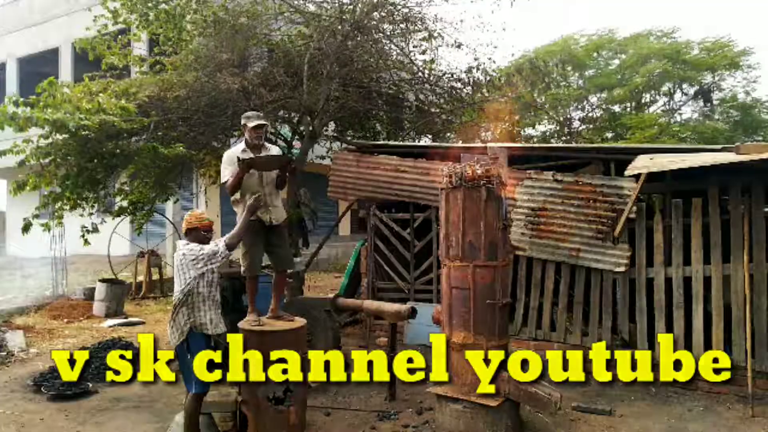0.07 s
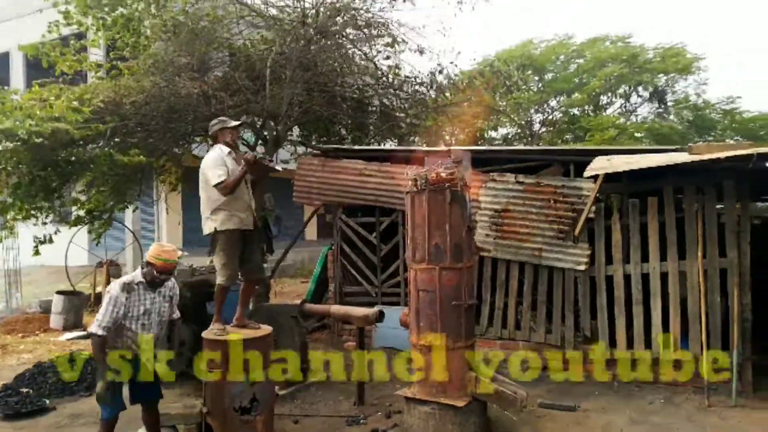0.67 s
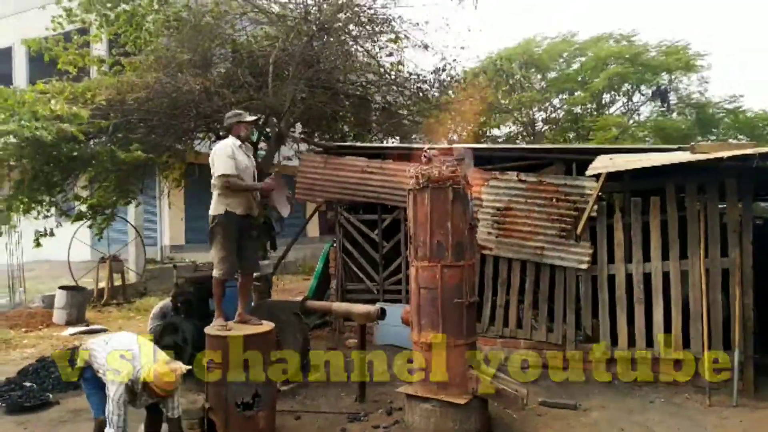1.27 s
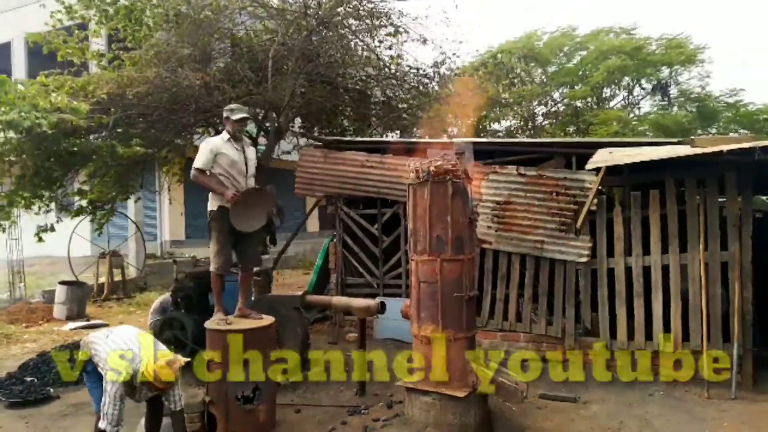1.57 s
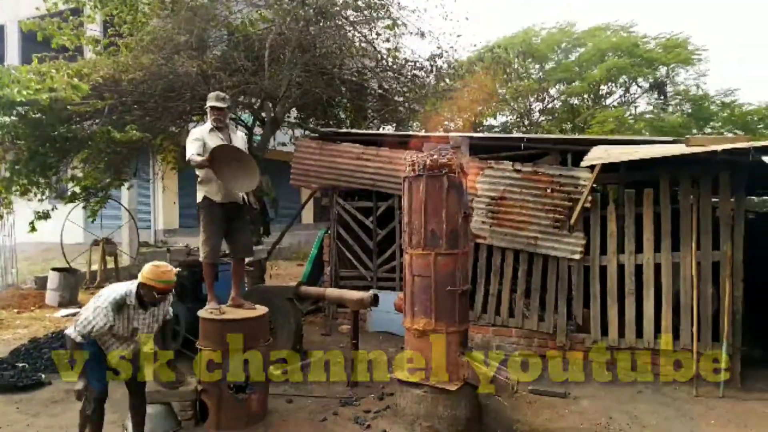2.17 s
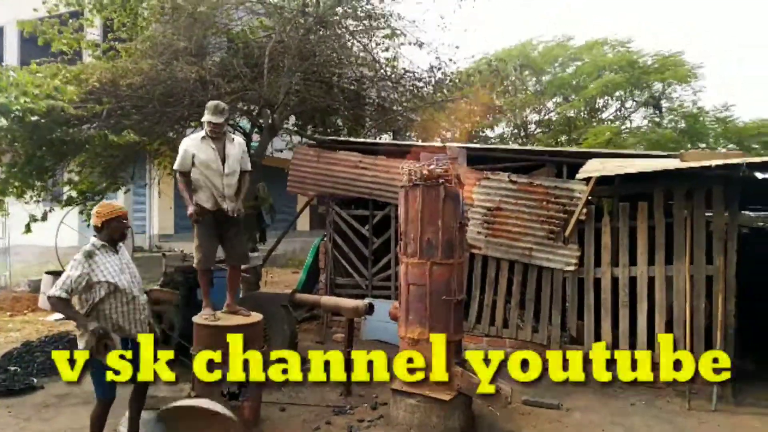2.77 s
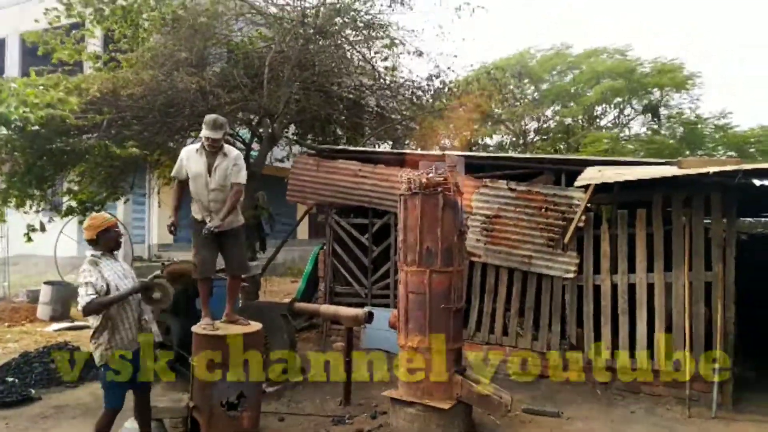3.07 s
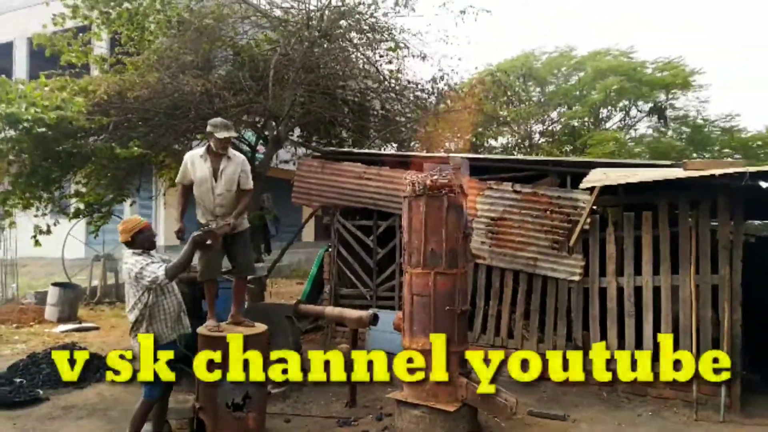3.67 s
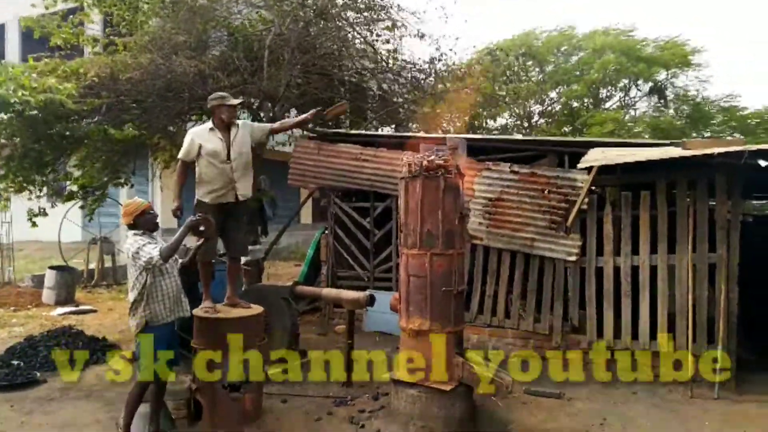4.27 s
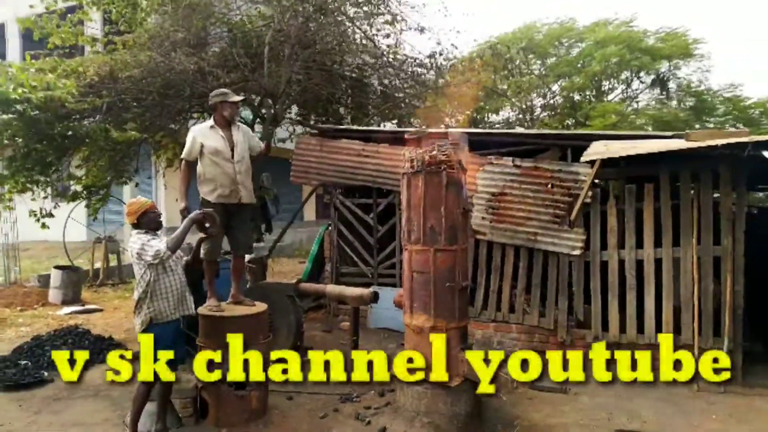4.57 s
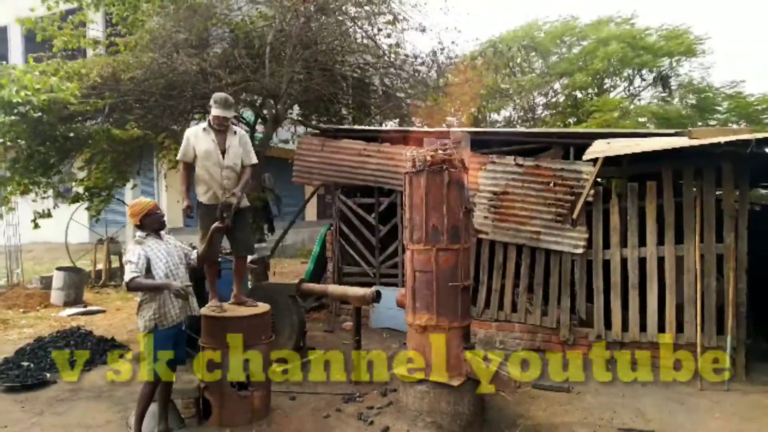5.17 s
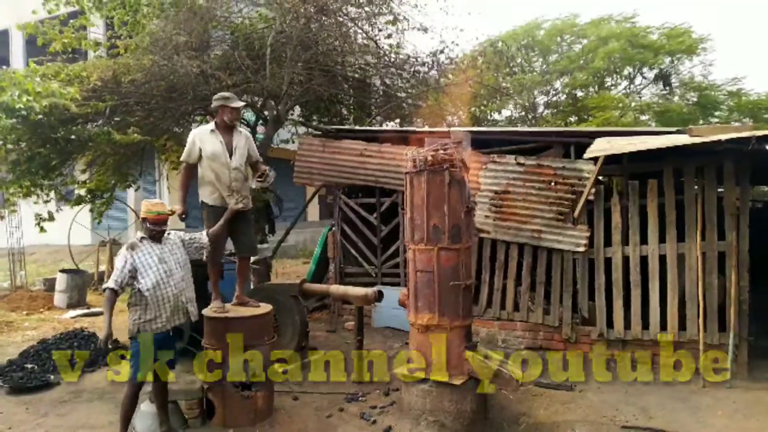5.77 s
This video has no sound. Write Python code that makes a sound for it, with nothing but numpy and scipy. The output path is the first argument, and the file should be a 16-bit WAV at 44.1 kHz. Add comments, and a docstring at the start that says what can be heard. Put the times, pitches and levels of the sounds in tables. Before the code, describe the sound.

A small furnace roars steadily in a yard between tin sheds, with low fluttering flames, a grainy air blast and faintly spitting coke. A blower hums with a slight waver while a single-cylinder engine thumps, puffs and clacks. Early on, a pan of lumps slides into the shaft in a brief clinking rush. Later, metal pans lightly knock and scrape, and a steel drum takes a few dull bumps.

```python
"""The roar of a small cupola furnace fades in, in a yard between tin sheds: fluttering flames, a grainy
air blast and spitting coke. A four-bladed blower feeds it air with a wavering hum, driven by a slow
single-cylinder engine that thumps, puffs and clacks on every cycle. A pan of charge is tipped into
the shaft in a clinking rush; metal pans knock and scrape as they are handed up, and a steel drum
takes a few dull bumps."""
import sys
import numpy as np
from scipy import signal
from scipy.fft import rfft, irfft
from scipy.io import wavfile

SR = 44100
rng = np.random.default_rng(int(sys.argv[2]) if len(sys.argv) > 2 else 0)


def transcribe(signal):
    """Save signal, clipped to [-1, 1], as a 16-bit WAV file at the path in sys.argv[1]."""
    frames = np.atleast_2d(signal).T
    limited = np.clip(frames, -1, 1)
    pcm = np.round(limited * 32767).astype(np.int16)
    wavfile.write(sys.argv[1], SR, pcm)


N = 265482
TIME = np.arange(N) / SR
BINS_HZ = np.maximum(np.arange(N // 2 + 1) * SR / N, 1)
FIRING_HZ, FIRST_FIRING_S = 7.7444, .117

# colour of the flames in the shaft (frequency [Hz], relative level [dB])
FLAME_COLOUR = [(15, -45), (25, -37), (59, 1.5), (112, -4), (135, -6), (160, -6), (185, -5), (218, -9),
                (309, -8), (335, -8.5), (395, -8.5), (437, -11), (480, -12.5), (555, -18.5), (615, -10.5),
                (766, -10.5), (1300, -21.5), (1690, -39), (2860, -120)]
# swells in the hollow upper roar (time [s], gain [dB])
UPPER_ROAR_SWELL = [(0.4, 3.5), (0.55, 2), (0.75, 2.5), (1.22, -2), (1.42, 1.5), (2.0, 0), (2.45, 2.5),
                    (2.95, 1.5), (3.1, -1.5), (3.35, 0), (3.78, 3), (4.05, 1.5), (4.95, 3.5), (5.25, 1.5),
                    (5.6, 2), (5.95, 1.5)]
# surges in the deepest rumble (time [s], gain [dB])
RUMBLE_SURGE = [(0.8, -2), (1.25, 1), (1.8, -1.5), (2.05, 0), (2.5, -4), (3.55, 0), (4.2, -5.5), (4.95, 0),
                (5.25, 0), (5.7, 2), (6.0, -2)]
# colour of the air rushing through pipe and coke bed (frequency [Hz], relative level [dB])
BLAST_COLOUR = [(710, -29), (1200, -8), (1350, -16), (1450, 2.5), (1700, -0.5), (1850, -4.5), (1970, -5),
                (2280, 2.5), (2590, -3), (3160, -5), (3420, -5.5), (3950, -5.5), (6160, -15.5), (8000, -33),
                (10400, -50), (17600, -120)]
# swing of the air rush, partly followed by blast and exhaust hiss (time [s], gain [dB])
AIR_RUSH = [(0.5, -2), (1.55, -0.5), (2.1, -2), (2.7, 0.5), (3.1, -2.5), (3.4, 0), (4.4, -0.5), (5.8, -2)]
# hollow resonance in the air rush (frequency [Hz], relative level [dB])
HOLLOW_COLOUR = [(1000, -50), (1380, -26), (1455, 1.5), (1505, -14), (1555, 0.5), (1605, -9.5), (1645, 4),
                 (1700, -3.5), (1800, -6.5), (2000, -11.5), (2200, -34), (2500, -16), (3500, -50)]
# that resonance dies away and returns (time [s], level [dB])
HOLLOW_LEVEL = [(0.35, -29.5), (0.95, -32), (1.7, -35.5), (2.2, -31), (2.7, -42), (3.3, -48), (3.9, -40),
                (4.7, -34), (5.5, -35), (6.0, -32.5)]
# colour of the spitting coke (frequency [Hz], relative level [dB])
CRACKLE_COLOUR = [(1500, -25), (3000, 3), (5000, 2), (6500, -6), (8000, -18), (10500, -10), (15000, -12)]

# blower shaft, sagging a little under load (time [s], speed [turns/s])
SHAFT_SPEED = [(0.5, 38.95), (1.8, 38.94), (2.9, 38.89), (3.6, 38.96), (5.8, 39.01)]
# the blade tone swells and sags (time [s], gain [dB])
BLADE_SWELL = [(0.35, -1), (0.55, 5), (0.8, 0), (1.12, 3), (1.35, -2), (1.65, 0.5), (1.85, 4), (2.9, 2),
               (3.3, -0.5), (3.68, -4.5), (4.0, -1), (4.35, -1.5), (4.75, 1), (5.1, -1), (5.35, 2),
               (5.6, 0), (5.88, 5.5)]
# pitch waver of the blade tone (time [s], depth [Hz])
BLADE_WAVER = [(0.5, 1.9), (1.4, 3.3), (1.9, 0.6), (2.9, 0.64), (3.5, 4.8), (4.4, 4.9), (5.2, 4.1),
               (5.8, 1)]
# second harmonic of the blade tone (time [s], level [dB])
SECOND_HARMONIC = [(0.3, -37), (0.6, -29.5), (0.88, -29), (1.25, -43), (1.85, -28), (2.15, -42),
                   (2.55, -28), (3.15, -37), (3.85, -34), (4.4, -35), (5.0, -31.5), (5.35, -44),
                   (5.85, -28.5)]
# third harmonic of the blade tone (time [s], level [dB])
THIRD_HARMONIC = [(0.5, -39.5), (2.65, -34.5), (3.0, -37.5), (3.5, -38), (4.4, -34.5), (5.3, -32),
                  (5.8, -36.5)]
# weaker blower tones (multiple of the shaft speed, relative level [dB])
SHAFT_TONES = [(3, -7), (5, -7.5), (7, -6.5), (10, -11), (20, -8), (24, -41)]

# low ringing in each engine cycle (time from exhaust opening [s], pitch [Hz], gain [dB], t60 [s])
THUMP_MODES = [(-.008, 58, -17, 0.15), (-.005, 79, -25.5, 0.33), (.02, 189, -25, .2),
               (.033, 131, -22.5, 0.18), (0.032, 290, -33, 0.035), (0.043, 363, -20.5, 0.072)]
# engine clacks (time from exhaust opening [s], low edge [Hz], high edge [Hz], level [dB], decay [s])
CLACKS = [(-.001, 2980, 6600, -38.5, 0.05), (.023, 1380, 2540, -31, 0.0094),
          (.041, 298, 543, -24.5, 0.0095), (.049, 3060, 4970, -47, 0.0099), (0.058, 3200, 5000, -43, .004),
          (0.099, 1400, 4200, -57.5, .007), (.104, 566, 1550, -26.5, 0.016)]
# colour of the fine exhaust hiss (frequency [Hz], relative level [dB])
EXHAUST_COLOUR = [(4710, -36), (8000, -20), (10000, -2.5), (10600, -3), (14200, -8), (15400, -12)]

# colour of the sliding charge (frequency [Hz], relative level [dB])
POUR_COLOUR = [(900, -27), (1600, 8.5), (2400, 0), (4500, 2), (6500, -7), (8000, -22), (11000, -6),
               (15500, -28)]
# the largest lumps crunch down (time [s], gain [dB], decay [s])
LUMP_CRUNCHES = [(1.374, -18, .004), (1.3827, -16, 0.0043), (1.398, -28, 0.0038), (1.409, -26, .005),
                 (1.42, -23, .004), (1.427, -24, .007), (1.441, -23, 0.0049)]
# pans knocking together (time [s], gain [dB], decay [s])
PAN_KNOCKS = [(2.966, -28, 0.0032), (4.681, -22, 0.0062), (4.686, -24, 0.0085), (4.692, -31, 0.0056),
              (4.697, -24, 0.0055)]
# brief high spits of hiss, some on the engine's puffs, some topping pan knocks and scrapes
# (time [s], gain [dB], decay [s])
HISS_TICKS = [(1.279, -31, 0.011), (1.668, -30, .008), (2.44, -32, 0.0073), (2.755, -27, .008),
              (3.352, -37, 0.0065), (3.442, -24, 0.0069), (3.458, -33, .015), (3.695, -30, .015),
              (4.686, -22, 0.0039)]
# pans sliding on one another (time [s], gain [dB], decay [s], centre of the rasp [Hz])
PAN_SCRAPES = [(1.278, -20, 0.007, 4800), (1.358, -19, 0.011, 3700), (3.44, -21, 0.0059, 3900),
               (3.457, -13, 0.008, 3400), (3.46, -15, 0.01, 4280), (3.47, -17, .02, 3280),
               (3.691, -14, 0.014, 3300), (3.704, -15, 0.012, 3400), (3.703, -22, 0.014, 6100)]
# the ring of a pan (pitch [Hz], relative gain [dB], t60 [s])
PAN_MODES = [(1900, 4, 0.028), (2210, 4, 0.033), (2820, 0, 0.015), (3080, 8, 0.017), (3750, -1, 0.015),
             (4000, 5.5, 0.016), (4040, 5, 0.015), (4450, 3, .012), (5000, 1, 0.016), (5840, 1, 0.016),
             (6140, 3, 0.017), (7640, -5, 0.018), (9860, -10, 0.01)]
# dull bumps on the steel drum (time [s], gain [dB])
DRUM_BUMPS = [(2.965, -14.5), (3.056, -10.5), (3.108, -15), (3.455, -14)]
# the ring of the drum (pitch [Hz], gain [dB], t60 [s])
DRUM_MODES = [(303, -8.5, 0.087), (358, -14, 0.03), (391, 2.5, 0.064)]

# how alike the yard sounds in both ears (frequency [Hz], likeness [0 to 1])
STEREO_LIKENESS = [(60, 0.8), (130, 0.88), (480, 0.91), (950, 0.86), (1400, 0.72), (2000, 0.2),
                   (3800, 0.21), (8000, 0.094), (15000, 0.11)]
# stereo lean of the yard's noise (frequency [Hz], left minus right [dB])
STEREO_LEAN = [(60, -1.5), (200, -0.5), (400, -1.5), (490, 11), (590, -6), (750, 0), (1170, 2.5),
               (1450, -4.5), (1850, 3.5), (2250, -0.5), (2750, 1.5), (4200, 0), (7500, 0), (11000, -5.5)]
# slapback off the tin walls (left delay [s], right delay [s])
SHED_ECHO_S = [0.0224, 0.057]


def furnace(flame_db=-19, flutter_db=.47, blast_db=-27.5):
    """Flames flutter in the bass; the air blast above them is grainy and carries a hollow ring."""
    flames = from_db(flame_db + flutter_db * drift(11)) * yard_noise(FLAME_COLOUR)
    flames = signal.sosfilt(signal.butter(8, 37, "high", fs=SR, output="sos"), flames)
    flames += (from_db(in_time(UPPER_ROAR_SWELL)) - 1) * band(flames, 550, 1170)
    flames += (from_db(in_time(RUMBLE_SURGE)) - 1) * band(flames, 35, 106)
    blast = from_db(blast_db + .68 * in_time(AIR_RUSH)) * yard_noise(BLAST_COLOUR)
    hollow = from_db(in_time(HOLLOW_LEVEL)) * yard_noise(HOLLOW_COLOUR)
    grain = rms_one(from_db(.94 * drift(160) + .5 * drift(9)))
    return flames + grain * (blast + hollow)


def blower(blade_db=-26, shaft_tones_db=-29, third_lean_db=-1.5):
    """Four blades hum with two harmonics, among weaker shaft tones; turbulence shakes each level."""
    turns = np.cumsum(in_time(SHAFT_SPEED) * (1 + .00054 * drift(1.62))) / SR

    def tone(multiple, level_db, shake_db=.5, slip=0):
        phase = 2 * np.pi * (multiple * turns + slip + rng.random())
        return np.sqrt(2) * from_db(level_db + shake_db * drift(4.4)) * np.sin(phase)

    waver_cycles = np.cumsum(in_time(BLADE_WAVER) * drift(10.2)) / SR
    blades = tone(4, blade_db + in_time(BLADE_SWELL), shake_db=.6, slip=waver_cycles)
    second = tone(8, in_time(SECOND_HARMONIC))
    third = tone(12, in_time(THIRD_HARMONIC))
    shaft = sum(tone(multiple, shaft_tones_db + db) for multiple, db in SHAFT_TONES)
    return blades + second + shaft + third * from_db(third_lean_db * np.array([[.5], [-.5]]))


def engine():
    """Every cycle brings an exhaust thump, a firing knock and the clatter of the valve gear."""
    strokes = cycle_clicks(0, uneven_db=1, jitter_s=.0005)
    thumps = sum(from_db(db) * ring(np.roll(strokes, round(delay_s * SR)), hz, t60)
                 for delay_s, hz, db, t60 in THUMP_MODES)
    thumps = band(band(thumps, 38, 3000), 42, 1500)
    clatter = np.zeros((2, N))
    for delay_s, low_hz, high_hz, level_db, decay_s in CLACKS:
        direct, left, right = rng.standard_normal((3, N))
        scatter = low_hz / 1500   # the sheds scatter short waves most
        rasp = rms_one(band(direct + scatter * np.array([left, right]), low_hz, high_hz))
        hits = cycle_clicks(delay_s, uneven_db=2, jitter_s=.0041)
        clatter += from_db(level_db) * rasp * decay(hits, decay_s)
    return shed_echo(thumps) + clatter


def exhaust(hiss_db=-41):
    """A puff of hiss as the valve opens, then a weaker flow, over a constant bed of hiss."""
    opening = cycle_clicks(-.0048, uneven_db=3.5, jitter_s=.0023)
    puff = 3.6 * (decay(opening, .011) - decay(opening, .006))
    flow = .5 * (decay(opening, .059) - decay(opening, .014))
    envelope = from_db(hiss_db + .96 * in_time(AIR_RUSH)) * (1.06 + .95 * puff + flow)
    grain = rms_one(from_db(.42 * drift(165) + .56 * drift(22)))
    return envelope * grain * yard_noise(EXHAUST_COLOUR)


def charge(start_s=1.352, attack_s=.018, hold_s=.051, decay_s=.03, pieces_per_s=450, ring_cycles=41):
    """The charge slides into the shaft in a brief rush of clinks; the largest lumps land with a crunch."""
    trickling_s = np.maximum(TIME - (start_s + attack_s + hold_s), 0)
    flow = ramp(start_s, attack_s) * np.exp(-trickling_s / decay_s)
    pitches = np.geomspace(1540, 6000, 16)
    landings = (rng.random(N) < pieces_per_s / SR) * rng.normal(0, 1, (2, N))
    pitch_index = rng.integers(0, len(pitches), N)
    clinks = sum(ring(landings * (pitch_index == k), hz, ring_cycles / hz) for k, hz in enumerate(pitches))
    pour = from_db(-26.5) * yard_noise(POUR_COLOUR) + from_db(-28) * rms_one(clinks)
    return flow * pour + bursts(LUMP_CRUNCHES, 1900, 5200)


def pans(attack_db=2.5, ring_db=-25.5, rasp_width_hz=590):
    """Broad knocks set a pan ringing, narrow scrapes barely do; high spits of hiss are layered in."""
    attacks = bursts(PAN_KNOCKS, 1250, 6000) + bursts(HISS_TICKS, 8050, 14000)
    scraping = sum(bursts([event], hz - rasp_width_hz / 2, hz + rasp_width_hz / 2)
                   for *event, hz in PAN_SCRAPES)
    force = attacks + from_db(-9.5) * scraping
    metal = sum(from_db(ring_db + db) * ring(force, hz, t60) for hz, db, t60 in PAN_MODES)
    return yard_tail(from_db(attack_db) * attacks + scraping + metal)


def steel_drum():
    """Dull bumps wake a short, low ring in the drum."""
    bumps = band(clicks(*np.transpose(DRUM_BUMPS)), 170, 600)
    return sum(from_db(db) * ring(bumps, hz, t60) for hz, db, t60 in DRUM_MODES)


def coke_crackle(pops_per_s=32, smallest_db=-41, spread_db=3.5):
    """The burning coke spits at random: many tiny pops and a few larger ones."""
    pops = rng.random(N) < pops_per_s / SR
    sizes = from_db(smallest_db + spread_db * np.minimum(rng.exponential(1, N), 3))
    return decay(pops * sizes, decay_s=.0044) * yard_noise(CRACKLE_COLOUR)


def yard_noise(colour, right_lead_s=.00024):
    """Stereo noise at unit power: a direct part whose treble reaches the right first, plus shed scatter."""
    direct, left, right = rfft(rng.standard_normal((3, N)))
    alike = np.clip(over_hz(STEREO_LIKENESS), 0, .99)
    left_lag_s = right_lead_s * BINS_HZ ** 2 / (BINS_HZ ** 2 + 1100 ** 2)
    arrival = np.array([np.exp(-2j * np.pi * BINS_HZ * left_lag_s) * direct, direct])
    pair = np.sqrt(alike) * arrival + np.sqrt(1 - alike) * np.array([left, right])
    eq_db = over_hz(colour) + over_hz(STEREO_LEAN) * [[.5], [-.5]]
    return rms_one(irfft(pair * from_db(eq_db), N))


def shed_echo(x, echo_db=-13.5):
    """The tin walls add one slapback for each ear."""
    echoes = np.array([np.interp(TIME - delay_s, TIME, x, left=0) for delay_s in SHED_ECHO_S])
    return x + from_db(echo_db) * echoes


def yard_tail(x, t60=.16, wet_db=-4):
    """The sheds add a short wash of reflections."""
    wash = rng.standard_normal((2, SR // 2)) * from_db(-60 * TIME[:SR // 2] / t60)
    wash /= np.sqrt(np.sum(wash ** 2, axis=1, keepdims=True))
    return x + from_db(wet_db) * signal.fftconvolve(x, wash, axes=1)[:, :N]


def cycle_clicks(delay_s, uneven_db, jitter_s):
    """One click per engine cycle, each a little different in strength and timing."""
    times = np.arange(FIRST_FIRING_S, N / SR, 1 / FIRING_HZ)
    timing, strength = rng.standard_normal((len(times), 2)).T
    return clicks(times + delay_s + jitter_s * timing, uneven_db * strength)


def bursts(events, low_hz, high_hz):
    """Each event is a short burst of band-passed noise that dies away."""
    envelope = sum(decay(clicks([time_s], [db]), decay_s) for time_s, db, decay_s in events)
    return band(rng.standard_normal((2, N)) * envelope, low_hz, high_hz)


def clicks(times, levels_db):
    """One click at each of the times."""
    track = np.zeros(N)
    samples = np.round(np.asarray(times) * SR).astype(int)
    track[np.clip(samples, 0, N - 1)] = from_db(levels_db)
    return track


def decay(hits, decay_s):
    """Each click becomes an envelope that dies away."""
    return signal.lfilter([1], [1, -np.exp(-1 / (decay_s * SR))], hits + 1e-18)


def ring(force, hz, t60):
    """One resonance: a unit click starts a dying sine of height 1."""
    radius, angle = from_db(-60 / (t60 * SR)), 2 * np.pi * hz / SR
    return signal.lfilter([0, np.sin(angle)], [1, -2 * radius * np.cos(angle), radius ** 2], force + 1e-18)


def band(x, low_hz, high_hz):
    """A gentle band-pass."""
    return signal.sosfilt(signal.butter(2, [low_hz, high_hz], "band", fs=SR, output="sos"), x + 1e-18)


def drift(rate_hz):
    """A random wander with a spread of 1, mostly slower than the given rate."""
    points, step = 16384, 20
    hz = np.fft.rfftfreq(points, step / SR)
    slow = irfft(rfft(rng.standard_normal(points)) / (1 + (hz / rate_hz) ** 2))
    return np.interp(np.arange(N) / step, np.arange(points), rms_one(slow))


def ramp(start_s, length_s):
    """A straight rise from 0 to 1."""
    return np.clip((TIME - start_s) / length_s, 0, 1)


def in_time(points):
    """A breakpoint curve over time."""
    return np.interp(TIME, *np.transpose(points))


def over_hz(points):
    """A breakpoint curve over log frequency."""
    hz, value = np.transpose(points)
    return np.interp(np.log(BINS_HZ), np.log(hz), value)


def from_db(db):
    """Decibels to gain."""
    return 10 ** (np.asarray(db) / 20)


def rms_one(x):
    """Scale to unit power."""
    return x / np.sqrt(np.mean(x ** 2) + 1e-20)


def scene():
    """The furnace, its machinery and the work around them."""
    return furnace() + coke_crackle() + blower() + engine() + exhaust() + pans() + steel_drum() + charge()


def record(dry):
    """The mix fades in and the very top is cut steeply."""
    fade = from_db(-1.05) * ramp(start_s=.13, length_s=.29) ** .57
    return signal.sosfilt(signal.ellip(12, .1, 90, 15450, fs=SR, output="sos"), dry * fade)


dry = scene()
out = record(dry)
transcribe(out)
```